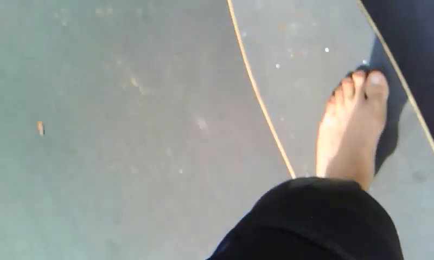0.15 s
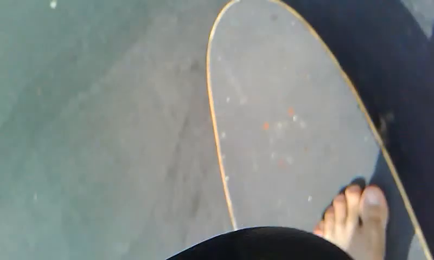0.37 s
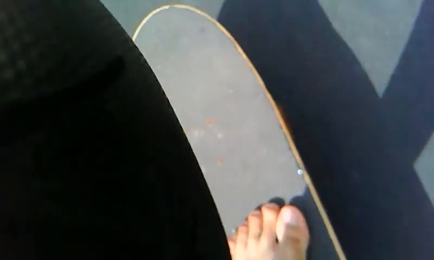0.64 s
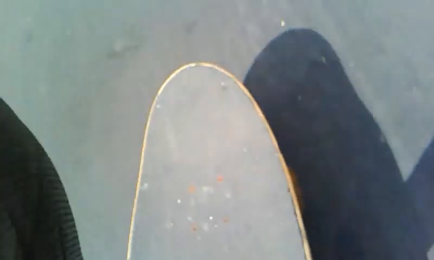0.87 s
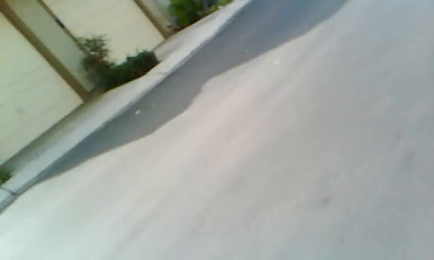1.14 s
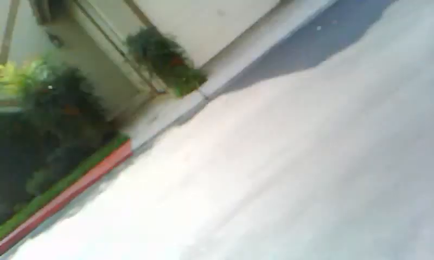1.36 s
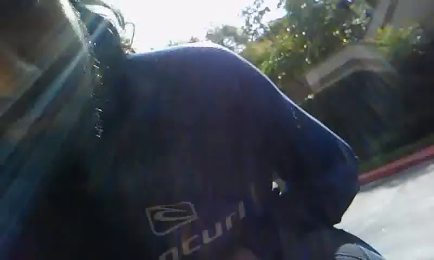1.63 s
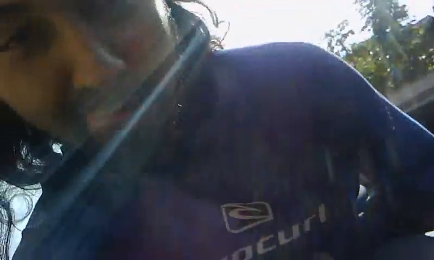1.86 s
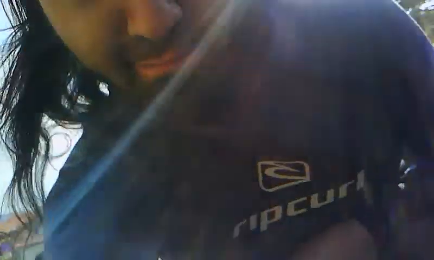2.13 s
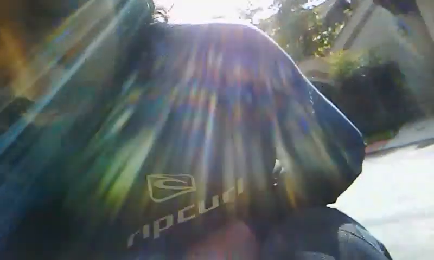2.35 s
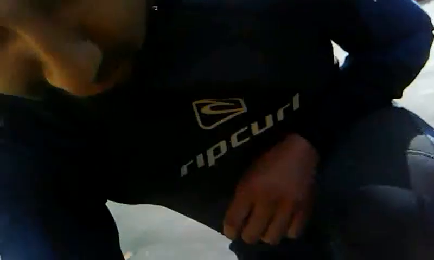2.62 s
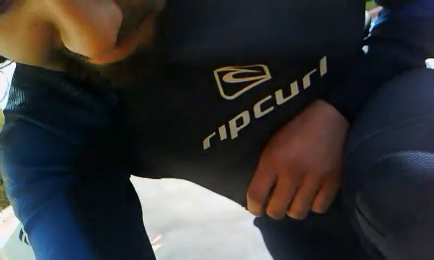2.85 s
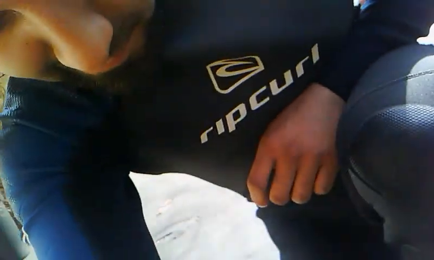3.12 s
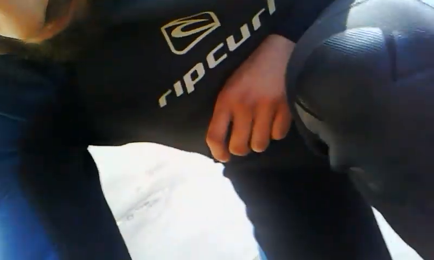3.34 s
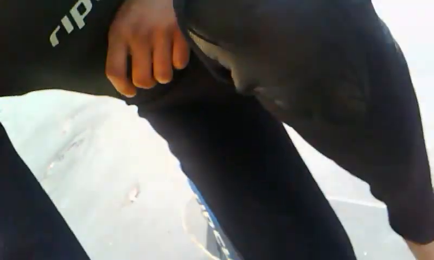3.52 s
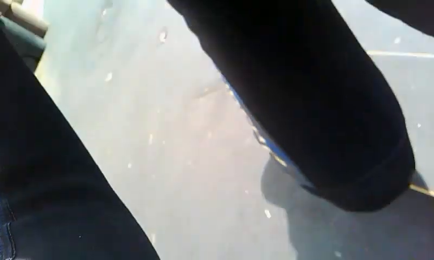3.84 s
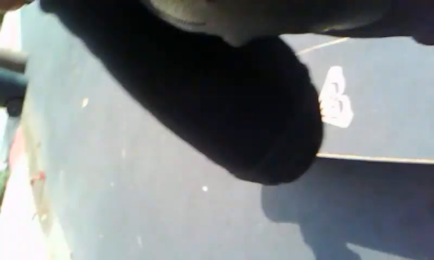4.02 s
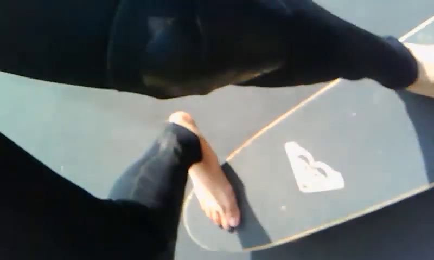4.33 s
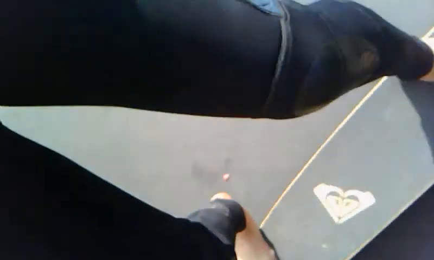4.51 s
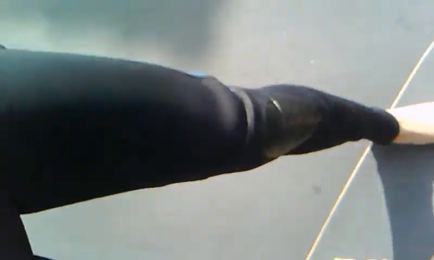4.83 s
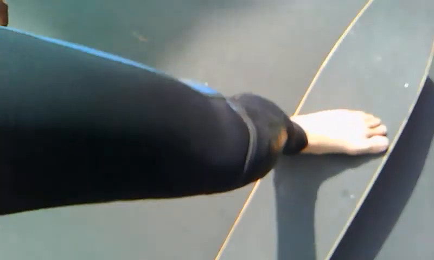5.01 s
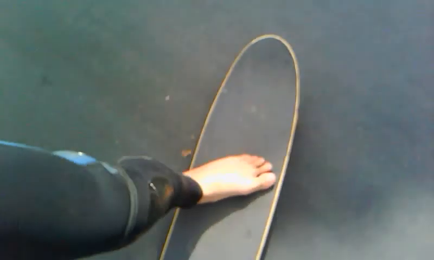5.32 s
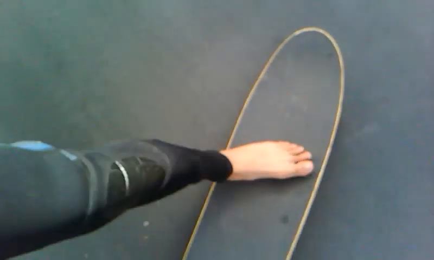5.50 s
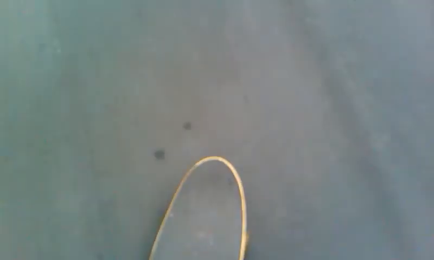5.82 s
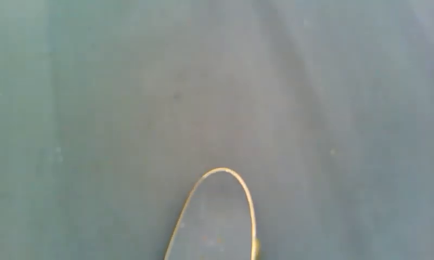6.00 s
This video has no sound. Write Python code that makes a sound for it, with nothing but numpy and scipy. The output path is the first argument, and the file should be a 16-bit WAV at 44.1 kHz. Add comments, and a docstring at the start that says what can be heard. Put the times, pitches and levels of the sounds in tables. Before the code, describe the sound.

A longboard rolls over asphalt with a drumming, singing rumble and light wetsuit rasps, then four hard board slams echo off houses between growling sideways swings.

```python
"""A longboard rolls over asphalt, heard from a small camera in the rider's hand: grit drums the deck, the wheels sing.
Random kicks through fixed spectra make the grit; the wheel note is a sine of unsteady pitch and strength.
Noise makes the wind at first and the swishing wetsuit; short pushes and crackle make the fingers on the case.
Then the nose swings from side to side: sideways wheels growl, four slams ring deck and trucks, house walls answer.
The camera is dull and overloads on the slams."""
import sys
import numpy as np
from scipy import signal
from scipy.fft import rfft, irfft, next_fast_len
from scipy.io import wavfile
from scipy.ndimage import map_coordinates

SR = 44100
rng = np.random.default_rng(int(sys.argv[2]) if len(sys.argv) > 2 else 0)


def inscribe(sig):
    """Save sig as 16-bit PCM at rate SR to the path in sys.argv[1].

    A 1-D sig is mono; a 2-D sig holds one channel per row.
    Samples are clipped to [-1, 1] before scaling.
    """
    pcm = np.round(np.clip(np.atleast_2d(sig).T, -1, 1) * 32767)
    wavfile.write(sys.argv[1], SR, pcm.astype(np.int16))


N = 271656
T = np.arange(N) / SR


def amp(db):
    """Decibels to linear gain."""
    return 10 ** (np.asarray(db) / 20)


def unit(x):
    """x scaled to rms 1."""
    return x / np.sqrt(np.mean(np.abs(x) ** 2) + 1e-20)


def along(points, hz):
    """Read (frequency, value) points at hz, on a log frequency axis."""
    point_hz, values = np.transpose(points)
    return np.interp(np.log(hz + 1), np.log(point_hz + 1), values)


def curve(rows):
    """Draw (time, value) points as one value per sample."""
    time_s, values = np.transpose(rows)
    return np.interp(T, time_s, values)


def wobble(rate):
    """A smooth random curve with rate knots a second."""
    return map_coordinates(rng.standard_normal(N // 50), [T * rate], mode="wrap")


def filtered(x, response):
    """x shaped by a gain that is a function of frequency."""
    m = next_fast_len(N + SR // 2)
    gain = response(np.fft.rfftfreq(m, 1 / SR))
    return irfft(rfft(x, m) * gain, m)[:N]


def coloured(x, spectrum):
    """x shaped by a (frequency, dB) spectrum, at rms 1."""
    return unit(filtered(x, lambda hz: amp(along(spectrum, hz))))


def add(track, s, sound):
    """Mix a sound into the track from time s."""
    start = max(round(s * SR), 0)
    track[start:start + len(sound)] += sound[:max(N - start, 0)]


def stones(rate, scatter_db):
    """Tiny kicks of uneven size, rate a second on average, as the wheels meet the stones of the asphalt."""
    hits = rng.random(N) < rate / SR
    return hits * rng.standard_normal(N) * amp(scatter_db * rng.standard_normal(N))


def waver(hz, spread_hz, flutter_db, rate):
    """A resonance kept going by random kicks: pitch and strength never settle."""
    pitch_hz = hz + spread_hz * (wobble(rate / 2) + wobble(2 * rate))
    tone = np.sin(2 * np.pi * np.cumsum(pitch_hz) / SR)
    return unit(amp(flutter_db * wobble(rate)) * tone)


# rolling level of the straight run: time_s, level_db
ROLLING_LEVEL = [(0, -36), (.2, -33.5), (.75, -29.5), (1.3, -30.5), (1.7, -32.5), (2.45, -31.5),
                 (2.88, -33.5), (3.08, -30.5), (3.22, -33.5), (3.72, -32), (4.05, -37), (4.27, -26.5),
                 (4.44, -40)]
# colour of the deck drummed by grit, relative: frequency_hz, density_db_per_hz
DECK_DRUM = [(25, -16), (60, -18), (95, -12), (122, 1), (170, -3), (240, -4), (310, 3), (360, -1.5),
             (490, 2), (600, 5), (760, -0.5), (1000, -9), (1600, -20.5), (3500, -48.5)]
# the wheels' note firms up as the board leans into a curve, then eases: time_s, level_over_rolling_db
LEAN_INTO_CURVE = [(.88, -16), (1.0, -1.5), (3.1, -4)]
# the grit's hiss is shaded as the camera turns from the wheels to the rider and back: time_s, shade_db
CAMERA_SHADE = [(.85, 0.5), (1.4, -7), (1.65, -11.5), (3.4, -14.5), (4.05, 0.5)]
# colour of the grit hiss, relative: frequency_hz, density_db_per_hz
GRIT_HISS = [(300, -21.5), (1000, -5), (1800, 3), (3300, 2), (5000, -1.5)]


def straight_run(hiss_db=-12.5):
    """Stones drum the deck, which hums; the wheels sing on one unsteady note. All follow the rolling level."""
    drum = amp(1.0 * wobble(14)) * coloured(stones(rate=2200, scatter_db=1.5), DECK_DRUM)
    hum = amp(-17.0) * waver(122, spread_hz=5, flutter_db=9.5, rate=16)
    song = amp(curve(LEAN_INTO_CURVE)) * waver(595, spread_hz=13.15, flutter_db=3.5, rate=50)
    # the asphalt is coarser in patches
    patches_db = 1.0 * wobble(23) + 0.91 * wobble(130)
    hiss = coloured(stones(rate=2200, scatter_db=-1.4), GRIT_HISS)
    hiss *= amp(hiss_db + curve(CAMERA_SHADE) + patches_db)
    return amp(curve(ROLLING_LEVEL)) * (drum + hum + song + hiss)


# air on the microphone: time_s, level_db
WIND_LEVEL = [(0, -29), (.35, -24), (.52, -23), (.65, -29), (.8, -27), (1.1, -39), (1.45, -35.5),
              (1.7, -50.5)]
# colour of the buffeting, relative: frequency_hz, density_db_per_hz
BUFFET_COLOUR = [(20, -14), (45, -16.5), (85, -5), (135, 2.5), (220, -2), (330, -6), (600, -9.5),
                 (1500, -50)]


def wind():
    """Lumpy buffeting on the microphone port: low noise whose level wobbles."""
    lumps = amp(1.8 * wobble(30)) * coloured(rng.standard_normal(N), BUFFET_COLOUR)
    return amp(curve(WIND_LEVEL)) * unit(lumps)


def rustles(count=16):
    """Faint wetsuit creases scattered over the ride, uneven in time, level and tone."""
    level_db, half_s, centre_hz = -55.5, .011, 2550
    return [((k + when) * N / SR / count, level_db + 6 * (size - .5), half_s, centre_hz + 600 * (tone - .5))
            for k, (when, size, tone) in enumerate(rng.random((count, 3)))]


# wetsuit strokes: middle_s, level_db, half_length_s, centre_hz
WETSUIT_STROKES = [(0.09, -47, .01, 2700), (0.321, -34.5, 0.019, 2660), (0.389, -37.5, 0.021, 3010),
                   (0.484, -43, .028, 2830), (0.749, -42, 0.012, 2150), (0.939, -41.5, .025, 2315),
                   (1.122, -47, 0.011, 2310), (1.242, -46, .012, 2500), (1.421, -31, 0.019, 2233),
                   (2.367, -53.5, .012, 2700), (2.62, -47, 0.026, 2480), (3.276, -50, 0.017, 2430),
                   (3.448, -44, 0.02, 2317), (3.559, -46.5, .019, 2550), (3.686, -51, 0.016, 2425),
                   (3.78, -52.5, .012, 2780), (4.137, -43.5, .065, 2980), (4.185, -36.5, 0.018, 2150),
                   (4.25, -37.5, .0067, 3050), (4.351, -35.5, .014, 2295), (4.435, -47.5, 0.025, 2370),
                   (4.777, -45.5, 0.0097, 2670), (5.014, -40.5, .008, 2690), (5.507, -50, .02, 2600),
                   (5.872, -40, .032, 1930)]


def wetsuit(width_hz=650, glide_hz=380):
    """Cloth slides over cloth: a band of rasp swells and fades, gliding upward through each stroke."""
    out = np.zeros(N)
    noise = unit(filtered(rng.standard_normal(N), lambda hz: 1 / (1 + (hz / width_hz) ** 2)))
    noise = unit(noise * amp(2.5 * wobble(300)))  # the fabric catches and slips
    other = np.roll(noise, N // 2)
    for s, db, half, centre_hz in [*WETSUIT_STROKES, *rustles()]:
        near = np.abs(T - s) < 3 * half
        u = (T[near] - s) / half
        phase = 2 * np.pi * np.cumsum(centre_hz + glide_hz * u) / SR
        # two noises carry the band up to its centre
        rasp = noise[near] * np.cos(phase) + other[near] * np.sin(phase)
        out[near] += amp(db) * np.exp(-u * u / 2) * rasp
    return out


# the grip shifts in a flurry of small pushes: middle_s, typical_drive_db, half_length_s, typical_push_scale_s
GRIP_SHIFTS = [(1.296, -20, .009, 0.0002), (1.423, -17, .018, 0.0011)]


def flurries(count=6):
    """The small pushes of a shifting grip, uneven in time, strength and length."""
    pushes = []
    for s, db, half, length in GRIP_SHIFTS:
        for k in range(count):
            when = s + half * (2 * (k + rng.random()) / count - 1)
            pushes.append((when, db + 1.8 * rng.normal(), length * amp(1.7 * rng.normal())))
    return pushes


# fingers on the camera case: start_s, drive_db (before a 4 dB lift), push_scale_s
FINGER_TAPS = [(.564, -14, 0.0021), (1.121, -17.5, .00027), (1.294, -7, 0.00019), (1.2967, -7.5, 0.0006),
               (1.3092, -10, .00012), (1.423, -10.5, 0.0023)]


def handling():
    """A finger gives the case a push and damped rebound, with a short crackle of plastic."""
    out, t = np.zeros(N), np.arange(SR // 20) / SR
    for s, db, length in [*FINGER_TAPS, *flurries()]:
        u = t / length
        push = np.sin(2 * u) * np.exp(-.7 * u)
        crackle = amp(-20 - 60 * t / 0.037) * rng.standard_normal(len(t))
        add(out, s, amp(db + 4) * (push + crackle))
    return out


def ring(modes, t, scatter_db, detune):
    """Sum of damped modes, a little different in level and pitch at every blow."""
    hz, db, t60 = np.transpose(modes)[:, :, None]
    size, shift = np.clip(rng.standard_normal((2, len(modes), 1)), -2, 2)
    decay = amp(db + scatter_db * size - 60 * t / t60)
    return np.sum(decay * np.sin(2 * np.pi * hz * (1 + detune * shift) * t), axis=0)


# light bumps in the asphalt, drives before the trims in blows and street: start_s, boom_db, knock_db, clack_db
ASPHALT_BUMPS = [(2.487, -25.5, -34.5, -43.5), (5.086, -23, -31, -44), (5.0976, -20, -30, -29),
                 (5.885, -21, -30, -44), (5.903, -19, -25, -34), (5.913, -21.5, -28, -19.5),
                 (5.947, -21.5, -25.5, -27)]
# slams, drives as for the bumps: start_s, boom_db, knock_db, clack_db, first_wheel_against_second_db,
# second_wheel_lag_s, bounce_time_s, boom_loss_per_bounce_db, deck_pitch_ratio (also scales the decay speed)
NOSE_SLAMS = [(4.4696, -4.5, -7.5, -1.5, -4.5, .0057, .0103, 4, 0.97),
              (4.8847, -2, -16, -10, 0, 0.0042, .0114, 14.5, 1.018),
              (5.2528, -3, -4, -6, -11.5, .0024, .009, 1.5, 1.01),
              (5.6424, -5, -12, -7, -10.5, .0032, .0078, 2, 1.01)]
# the bounces every slam shares, against the second wheel: knock_and_clack_db, boom_db (before the loss per bounce)
SLAM_BOUNCES = [(-2.5, .5), (-18, 2.5), (-19, -10)]


def contacts():
    """Wheel contacts (time, boom, knock, clack, pitch ratio): bumps; slams of one wheel, the other, then bounces."""
    rows = [(*bump, 1) for bump in ASPHALT_BUMPS]
    for s, boom_db, knock_db, clack_db, first_db, lag, flight, loss_db, pitch in NOSE_SLAMS:
        rows.append((s, boom_db + first_db, knock_db + first_db, clack_db + first_db, pitch))
        rows.append((s + lag, boom_db, knock_db, clack_db, pitch))
        for k, (hard_db, soft_db) in enumerate(SLAM_BOUNCES, 1):
            bounce_boom_db = boom_db + soft_db - k * loss_db
            rows.append((s + k * flight, bounce_boom_db, knock_db + hard_db, clack_db + hard_db, pitch))
    return rows


# colour of the dull thud of a wheel on asphalt, relative: frequency_hz, density_db_per_hz
WHEEL_THUD = [(30, -8.5), (80, -9), (230, 0.5), (500, 6.5), (750, 6), (1050, -6.5), (1400, -23),
              (3500, -23)]
# the deck's low boom, typical modes: frequency_hz, level_db, t60_s
DECK_BOOM = [(100, -25, 0.093), (194, -19.5, 0.05), (318.6, -18, 0.11), (449.2, 1.5, 0.065)]
# the deck's harder knock, typical modes: frequency_hz, level_db, t60_s
DECK_KNOCK = [(536, -6, 0.022), (633.7, 0, 0.043), (670, -6, 0.085), (755.4, -4.5, 0.085),
              (892.5, -11, 0.052), (994, -6, 0.042)]
# the metal trucks, typical modes: frequency_hz, level_db, t60_s
TRUCK_MODES = [(1569, -9.5, 0.071), (1736, -5, 0.055), (1868, 1.5, 0.023), (2304, -10, 0.058),
               (2580, -10, 0.018), (2750, -14.5, 0.016), (3180, -12.5, 0.04)]


def blows():
    """Each wheel contact excites damped modes: the deck booms and knocks, the metal trucks clack."""
    out, t = np.zeros(N), np.arange(SR // 5) / SR
    thuds = coloured(rng.standard_normal(N), WHEEL_THUD)
    onset = 1 - np.exp(-t / 0.00078)
    for s, boom_db, knock_db, clack_db, pitch in contacts():
        thud = amp(-1.5 - 60 * t / 0.064) * thuds[round(s * SR):][:len(t)]
        crack = amp(2.5 - 60 * t / 0.021) * rng.standard_normal(len(t))
        boom = amp(boom_db + 1.0) * ring(DECK_BOOM, pitch * t, scatter_db=4.0, detune=0.019)
        knock = amp(knock_db - 0.5) * (ring(DECK_KNOCK, pitch * t, scatter_db=5.5, detune=0.02) + thud)
        clack = amp(clack_db - 4.0) * (ring(TRUCK_MODES, t, scatter_db=1.5, detune=0.011) + crack)
        add(out, s, (boom + knock + clack) * onset)
    return out


# how long the street answers: frequency_hz, t60_s
STREET_DECAY = [(300, 0.81), (1500, 0.38), (3500, 0.47)]
# colour of the house walls: frequency_hz, gain_db
WALL_COLOUR = [(100, -24), (230, -14), (400, -1), (800, 2.5), (1250, 3), (1560, 7), (1750, 4.5), (2000, 1),
               (2500, -3), (3400, -11)]


def street():
    """House walls scatter back each wheel contact: a noise tail that swells in late, decays and flutters."""
    out = np.zeros(N)
    for s, boom_db, knock_db, clack_db, _ in contacts():
        hz, t, z = signal.stft(rng.standard_normal(SR // 2), SR, nperseg=256)
        decay = amp(-60 * t / along(STREET_DECAY, hz)[:, None])
        tail = signal.istft(z * decay, SR, nperseg=256)[1]
        tail *= 1 - np.exp(-(np.arange(len(tail)) / SR / 0.025) ** 2)
        add(out, s, (amp(clack_db - 24) + amp(boom_db - 25.0)) * tail)
    return amp(1.1 * wobble(70)) * filtered(out, lambda hz: amp(along(WALL_COLOUR, hz)))


# side-to-side swings, before the dip at each lift: hardest_push_s, scrub_db, half_length_s, grinding_grit_db
SIDE_SWINGS = [(4.671, -30, 0.073, -47), (5.07, -28, 0.082, -49), (5.469, -26.5, 0.074, -50.5),
               (5.923, -35, 0.088, -53.5)]
# colour of wheels pushed sideways, relative: frequency_hz, density_db_per_hz
SCRUB_COLOUR = [(25, -27.5), (60, -34.5), (110, -20), (170, -11.5), (230, -19), (310, -6), (390, -7.5),
                (463, 1.5), (560, -8.5), (680, -12.5), (790, -7), (950, -18.5), (1300, -30.5), (3500, -39)]
# colour of the grinding grit, relative: frequency_hz, density_db_per_hz
GRIND_COLOUR = [(300, -23.5), (1050, 10.5), (1300, 9), (1550, 12.5), (1750, -1.5), (2000, 12.5), (2400, -5),
                (3300, -5.5), (5000, -35.5)]


def swings():
    """Wheels pushed sideways: a hollow growl with grinding grit swells, and dips as the nose lifts before a slam."""
    scrub, grit = amp(-35.5), amp(-56)  # the wheels between two pushes
    for s, scrub_db, half, grit_db in SIDE_SWINGS:
        push = np.exp(-((T - s) / half) ** 2 / 2)
        scrub = np.hypot(scrub, amp(scrub_db) * push)
        grit = np.hypot(grit, amp(grit_db) * push)
    lift_db, lift_lead_s, lift_half_s = -2.5, 0.052, 0.061
    lifted = sum(np.exp(-((T - s + lift_lead_s) / lift_half_s) ** 2) for s, *_ in NOSE_SLAMS)
    growl = scrub * coloured(stones(rate=6700, scatter_db=4.5), SCRUB_COLOUR)
    grind = grit * amp(1.4 * wobble(47)) * coloured(stones(rate=5000, scatter_db=8), GRIND_COLOUR)
    return amp(lift_db * lifted) * (growl + grind)


def scene():
    """The straight run gives way to the swings at the first slam."""
    swinging = np.clip((T - 4.45) / .05, 0, 1)
    rolling = (1 - swinging) * straight_run() + swinging * swings()
    return (rolling + wind() + wetsuit() + handling() + blows() + street())[None]


# the camera's narrow speech band: frequency_hz, gain_db
SPEECH_BAND = [(3250, -0.5), (3550, -5), (4000, -15), (4400, -29.5), (4900, -81), (5600, -120)]


def record(dry, top_hz=16100):
    """A tiny microphone without deep bass, a narrow speech band, then hard overload, which alone spits treble."""
    thin = signal.sosfilt(signal.butter(3, 56, "high", fs=SR, output="sos"), dry[0])
    narrow = filtered(thin, lambda hz: amp(along(SPEECH_BAND, hz)))
    clipped = np.clip(narrow, -.71, .71)
    return filtered(clipped, lambda hz: hz < top_hz)[None]


dry = scene()
out = record(dry)
inscribe(out)
```